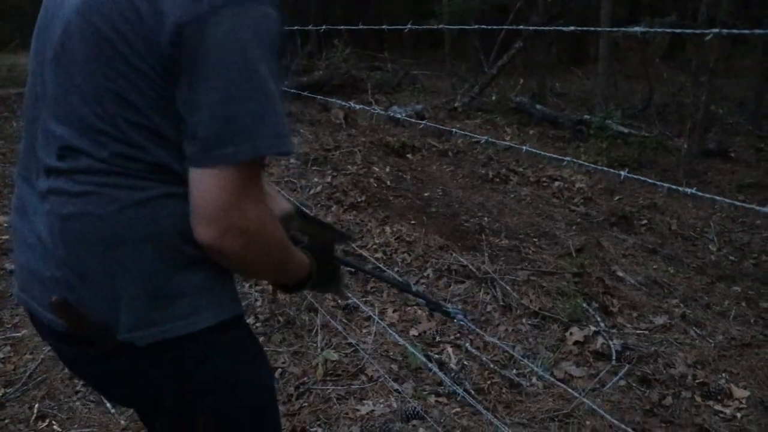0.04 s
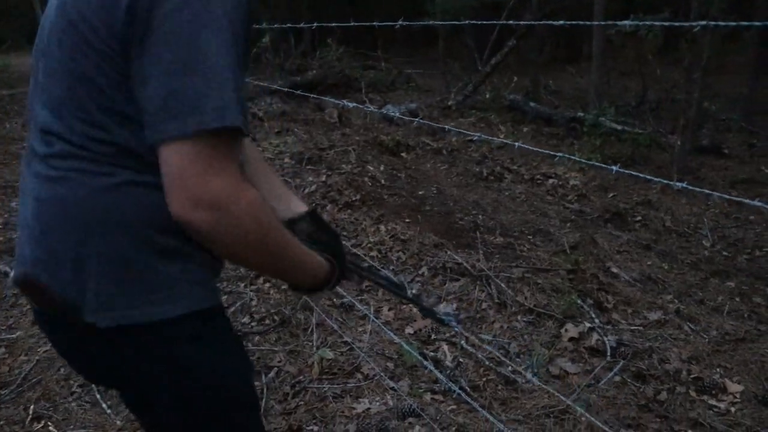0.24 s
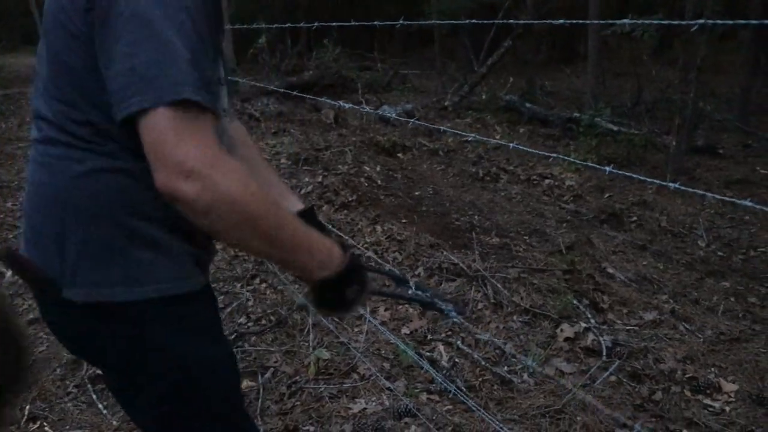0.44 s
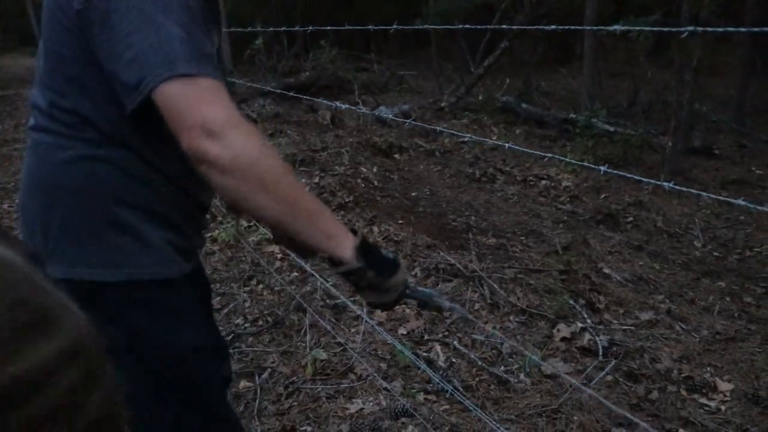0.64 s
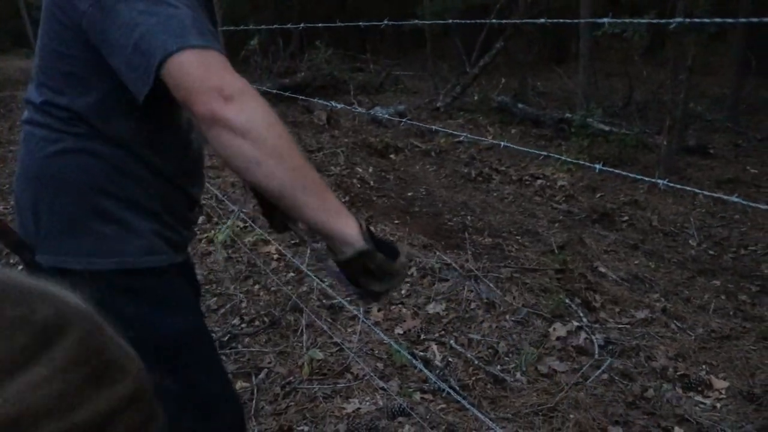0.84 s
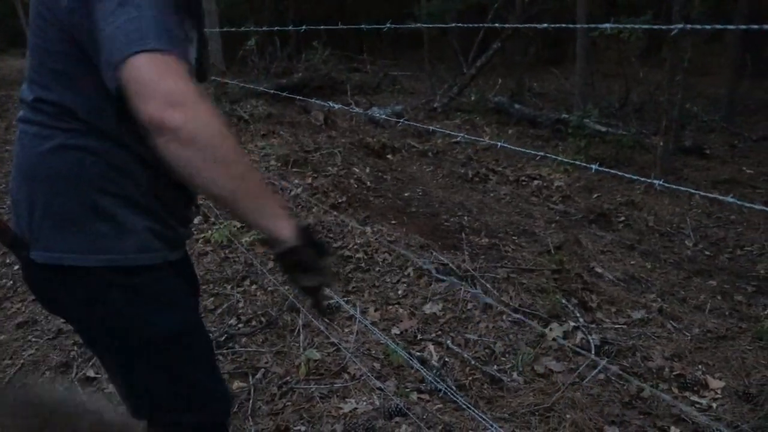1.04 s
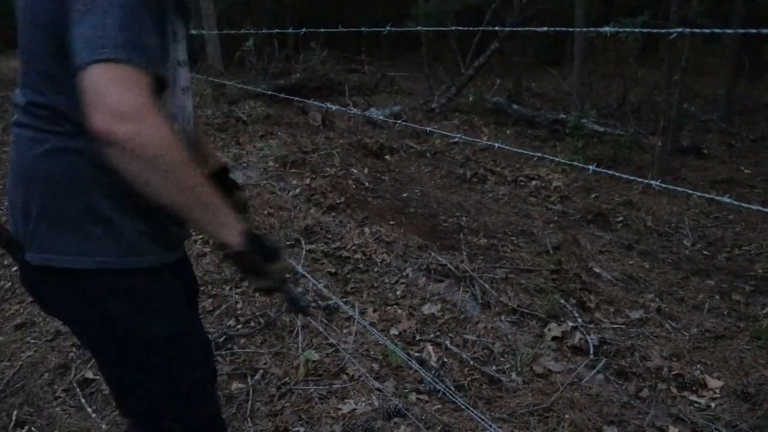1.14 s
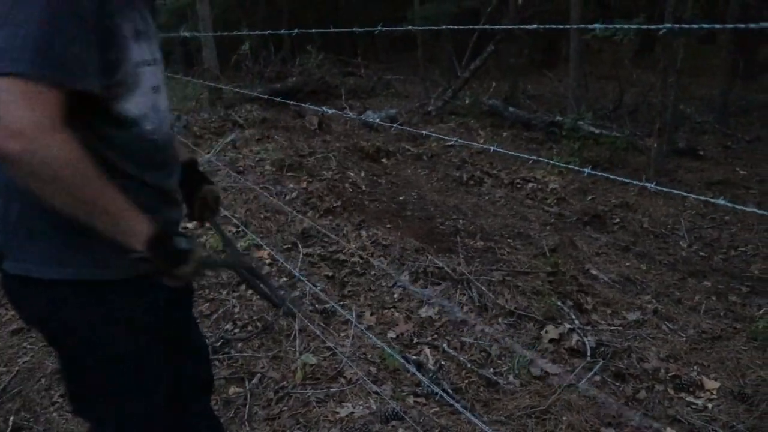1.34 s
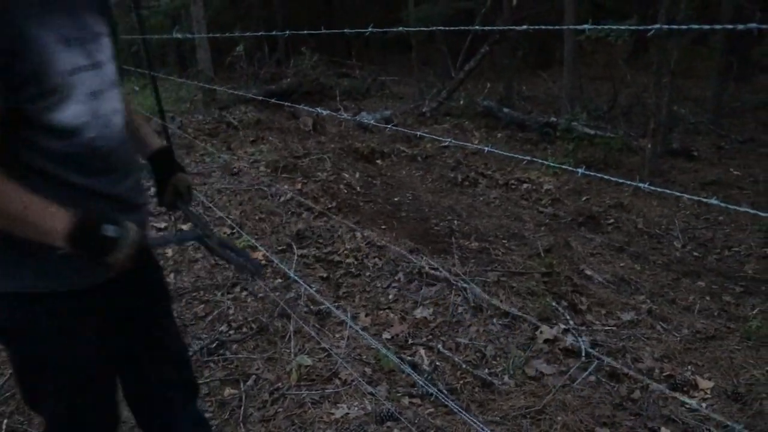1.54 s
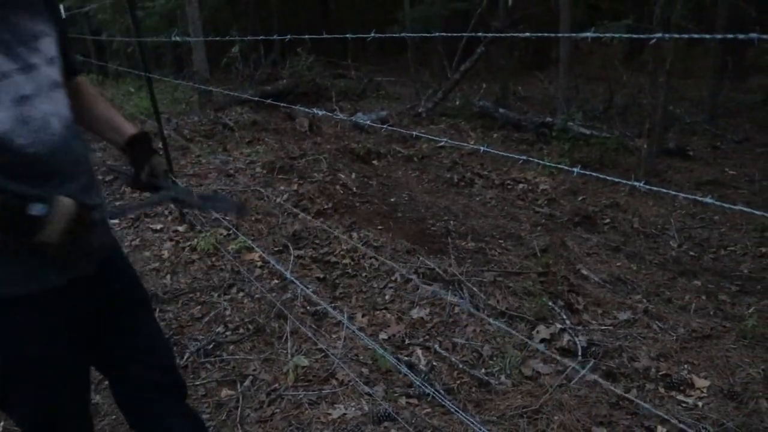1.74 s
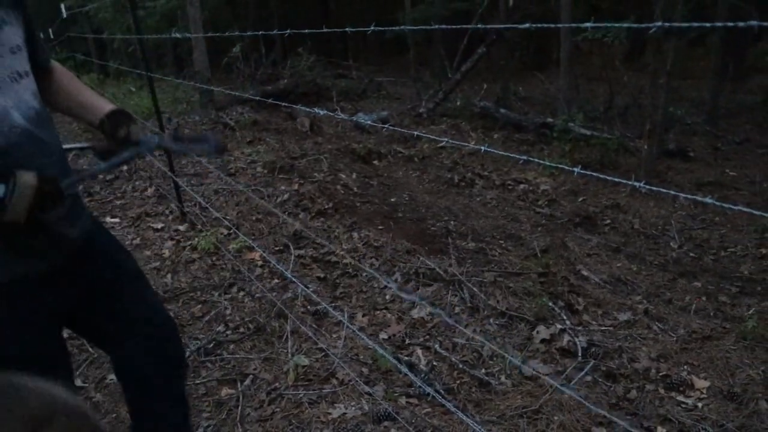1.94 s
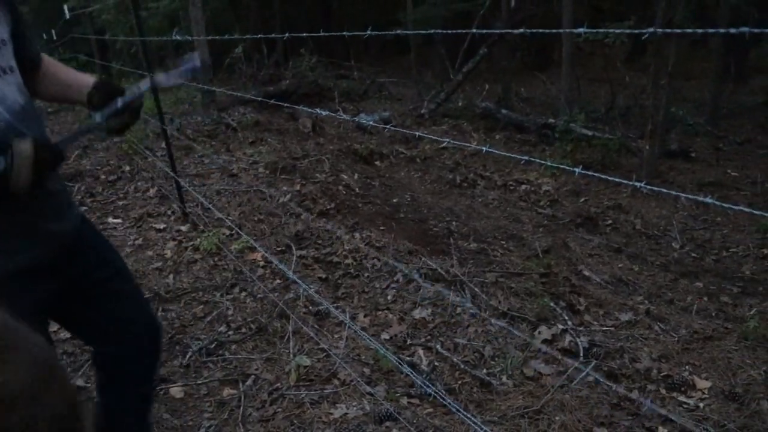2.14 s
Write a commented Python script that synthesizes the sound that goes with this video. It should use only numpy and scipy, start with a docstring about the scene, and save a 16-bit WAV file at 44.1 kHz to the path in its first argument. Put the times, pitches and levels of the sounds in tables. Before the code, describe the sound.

A steel fence tool jingling thinly, with a clack, a squeak and steps on dry leaves.

```python
"""Lifting a tensioning tool off a fence

Someone lifts a steel tensioning tool off barbed wire and steps back over dry leaves. Small loose
parts jingle in very high, beating modes, the jaws clack, the wire rasps and a joint squeaks once.
Leaves and clothes rustle in tiny cracks, twigs tick and boots bump over the quiet air of a wood."""
import sys
import numpy as np
from scipy import signal
from scipy.fft import rfft, irfft
from scipy.io import wavfile
from scipy.ndimage import uniform_filter1d

SR = 44100
rng = np.random.default_rng(int(sys.argv[2]) if len(sys.argv) > 2 else 0)


def waveform_to_disk(signal):
    """Save audio, clipped to [-1, 1], as 16-bit WAV at the path in sys.argv[1]."""
    frames = np.transpose(np.atleast_2d(signal))
    scaled = np.clip(frames, -1, 1) * 32767
    samples = np.round(scaled).astype(np.int16)
    wavfile.write(sys.argv[1], SR, samples)


N = 97020

# Tone curves of the air, the leaves, a knock's crack and steel scraping on steel.
# Each row: frequency in Hz, relative level in dB.
AIR_EQ = [(20, 0), (80, -9.5), (300, -7), (1000, -13), (3500, -11.5), (6000, -18), (8800, -6), (11000, -14),
          (15500, -15.5)]
LEAF_EQ = [(170, -13.5), (330, -4.5), (1000, -3.5), (1750, -1), (2800, -3), (6500, -5), (9000, -1.5),
           (11000, -15), (15500, -20)]
CRACK_EQ = [(100, -40), (380, -5), (900, -9), (1500, 1.5), (2300, 3), (2900, -8), (8500, -6),
            (13500, -20.5), (16000, -28)]
SCRAPE_EQ = [(3200, -23), (4800, -18), (6500, -24), (9000, -20), (11000, -24), (12500, 0), (14000, -1.5),
             (15500, -16)]
# The fader ride of the body's movement. Each row: time in seconds, level in dB.
MOVEMENT_RIDE = [(0, -50), (.1, -43.5), (.19, -49.5), (.29, -44.5), (.36, -38), (.42, -39.5), (0.521, -40),
                 (.6, -48), (0.769, -44.5), (.85, -38.5), (.96, -37), (1.12, -43.5), (1.25, -49),
                 (1.455, -57.5), (1.468, -41.5), (1.53, -43.5), (1.62, -45.5), (1.741, -46.5), (1.82, -48),
                 (1.9, -45), (1.99, -42), (2.06, -54)]
# Boots landing. Each row: start in seconds, level in dB, crunch t60 in seconds, centre in Hz.
BOOT_STEPS = [(.508, -33, 0.08, 1600), (.518, -31.5, 0.03, 950), (.529, -27, 0.021, 540),
              (0.58, -34.5, 0.021, 620), (1.104, -29, .03, 367), (1.585, -33.5, 0.016, 850),
              (1.604, -41, .06, 320)]
# Twigs and barbs. Each row: start in seconds, relative level in dB, centre in Hz.
TWIG_TICKS = [(.2432, -14, 9500), (.6105, -21, 6000), (.6175, -24, 3200), (.654, -24, 3400),
              (.894, -23, 2000), (1.04, -25, 1500), (1.306, -20, 4000), (1.331, -28, 2400),
              (1.627, -27, 1800), (1.565, -25, 5500), (1.668, -23, 8000)]
# Wire dragging through the jaws. Each row: start in seconds, length in seconds, level in dB.
WIRE_DRAGS = [(0.056, 0.05, -32), (0.63, 0.11, -42.5)]
# What the dragging rings. Each row: frequency in Hz, relative level in dB.
RASP_MODES = [(1670, 0.5), (1900, -9), (2450, 1.5), (3450, 1.5), (4900, -5)]
# The joint's squeak. Each row: time in seconds, pitch in Hz, level in dB.
SQUEAK_CURVE = [(1.872, 6800, -60), (1.882, 7060, -41), (1.9, 6930, -32), (1.906, 6800, -27.5),
                (1.912, 7064, -20.5), (1.924, 7100, -18.5), (1.942, 7080, -24), (1.958, 7040, -25),
                (1.966, 7200, -39)]
# Light touches around the tool. Each row: start in seconds, level in dB, t60 in seconds,
# contact noise in relative dB, then the main, low and third mode in Hz.
TOOL_CLINKS = [(1.383, -37, .04, -6, 3445, 1340, 4720), (2.184, -29, .035, 5, 5590, 1800, 3450)]
# Jaws and handles knocking. Each row: start in seconds, relative level in dB, t60 in seconds,
# treble tilt in dB per decade.
JAW_KNOCKS = [(.003, -26.5, 0.032, 5), (0.068, -32, 0.028, -3), (.839, -29, 0.031, -17),
              (1.4996, -13, 0.022, -6), (1.5012, -9.5, 0.02, -3.5), (1.5085, -21, 0.018, 11)]
# The tool's body. Each row: frequency in Hz, relative level in dB, factor on the knock's t60.
BODY_MODES = [(1320, -9, 1.05), (1483, -5.5, 0.92), (1720, -5, 0.72), (2298, -.5, 1.28), (2430, -8, 1.2),
              (3395, -6.5, 1.5), (3577, -6.5, 1.7), (3820, -12, 1.5), (4645, -11, 1.8), (5630, -7.5, 1.2),
              (7040, -14, 1.1), (7860, -9, 1.7), (8140, -13, 1.4)]
# The hard clack's long tail. Each row: frequency in Hz, level in dB, t60 in seconds.
CLACK_TAIL = [(10200, -34, 0.2), (12600, -38, .15), (13700, -30, .06)]
# Loose parts skidding. Each row: start in seconds, level in dB, t60 in seconds.
PART_SKIDS = [(.341, -22, .03), (.356, -19, .06), (.833, -25, .04), (1.7265, -26, .03), (1.731, -11, .016),
              (1.734, -17, .035), (1.739, -24, .035)]
# Loose parts touching. Each row: start in seconds, relative level in dB, t60 in seconds,
# upper-mode boost in dB.
PART_HITS = [(.012, -33, 0.3, -6), (.092, -25, .17, -3), (.1625, -29, 0.098, -12), (.2245, -12, 0.34, -4),
             (.2435, -12, 0.2, 2), (.266, -12, 0.25, -2.5), (.294, -15.5, 0.28, 6), (.313, -15, 0.22, -6),
             (0.3393, -6.5, 0.065, -18), (.356, -9.5, 0.073, -4), (.374, -7.5, 0.047, -17),
             (.4372, -21.5, 0.12, 2), (.553, -27, .05, -5), (0.5796, -26, 0.13, -3), (.604, -29, 0.2, -8),
             (.682, -26.5, .045, -3), (.8235, -17, 0.088, -17), (.833, -19, 0.073, -2),
             (0.9007, -18.5, 0.082, -9), (.945, -18, .23, 0.5), (0.984, -25, 0.34, -3),
             (1.016, -27, 0.23, -11), (1.0825, -15.5, 0.085, -3), (1.132, -21, 0.056, -5),
             (1.18, -25, .075, 3), (1.633, -35.5, 0.13, 2.5), (1.659, -28, .08, -12),
             (1.668, -23, 0.064, -11), (1.701, -22, 0.058, -12), (1.711, -29, 0.066, 3),
             (1.7312, -18, .06, -4), (2.174, -33.5, 0.22, -11)]
# Their ring. Each row: frequency in Hz, relative level in dB, share of the boost from 0 to 1.
PART_MODES = [(12225, -10, 0), (12362, -6, 0), (12412, -3, 0), (12812, -12, 1), (12855, -3, 1),
              (13765, -17, 1), (13795, -10, 1)]
# Their tuning shifts as they move. Each row: time in seconds, pitch ratio.
PART_TUNING = [(.35, 1), (.44, 1.003), (.83, 1.001), (.9, .995), (1.08, .994), (1.15, 1.004), (2.2, 1.002)]


def undb(db):
    """Decibels to gain."""
    return 10 ** (np.asarray(db) / 20)


def unit(x):
    """Scale to rms 1."""
    return x / np.sqrt(np.mean(x ** 2) + 1e-18)


def fade(t60):
    """Exponential decay, 60 dB down after t60 seconds."""
    return np.exp(-np.log(1000) * np.arange(N) / SR / max(t60, 1 / SR))


def add(out, start, x):
    """Mix x in from start seconds on."""
    i = int(np.clip(start * SR, 0, N - 1))
    out[i:i + len(x)] += x[:N - i]


def colour(x, points):
    """EQ x through (Hz, dB) points, rolling off outside them; rms 1."""
    hz, db = np.array(points, float).T
    f = np.arange(N // 2 + 1) * SR / N + 1
    curve = undb(np.interp(np.log(f), np.log(hz), db))
    skirt = np.minimum(f / hz[0], 1) ** 2 * np.minimum(hz[-1] / f, 1) ** 2
    return unit(irfft(rfft(x) * curve * skirt, N))


def noise(points):
    """Coloured noise of rms 1."""
    return colour(rng.standard_normal(N), points)


def band(hz):
    """Noise in a broad hump around hz."""
    return noise([(hz / 2, -10), (hz, 0), (hz * 2, -12)])


def drift(rate):
    """Smooth random wander of rms 1, turning rate times a second."""
    hold = max(int(SR / rate), 1)
    stairs = np.repeat(rng.standard_normal(N // hold + 1), hold)
    return unit(uniform_filter1d(stairs, hold)[:N])


def ring(hz, t60, phase=0):
    """One decaying mode, starting at rms 1."""
    t = np.arange(SR // 2) / SR
    return np.sqrt(2) * np.sin(2 * np.pi * hz * t + phase) * fade(t60)[:len(t)]


def crackle(per_s, spread_db=2.5):
    """Tiny clicks at random moments, a few much louder than the rest."""
    sizes = undb(spread_db * np.minimum(rng.exponential(size=N), 4)) * rng.standard_normal(N)
    return sizes * (rng.random(N) < per_s / SR)


def resonate(drive, response):
    """Play drive through a resonator; rms 1."""
    return unit(signal.fftconvolve(drive, response)[:N])


def match_energy(x, envelope):
    """Scale x to the energy that the envelope holds."""
    return x * np.sqrt(np.sum(envelope ** 2) / (np.sum(x ** 2) + 1e-18))


def low_cut(x, hz):
    """Roll off the bass below hz."""
    return signal.sosfilt(signal.butter(3, hz, "high", fs=SR, output="sos"), x)


def movement():
    """How briskly the body moves, as a gain."""
    return undb(np.interp(np.arange(N) / SR, *np.array(MOVEMENT_RIDE).T))


def air():
    """The bed: steady hiss of the wood and a faint swelling rumble."""
    hiss = undb(-49.5) * noise(AIR_EQ)
    rumble = undb(-64 + 1.5 * drift(5.84)) * band(hz=28)
    return hiss + rumble


def wood_echo(near):
    """The trees scatter back a short, soft reverb."""
    trees = noise([(150, 7), (2000, -5), (8000, -7.5), (15000, -6)]) * fade(t60=.34)
    return undb(-18) * signal.fftconvolve(near, trees / np.sqrt(np.sum(trees ** 2)))[:N]


def rustle(flicker_db=1.5, clump_db=1.6):
    """Dry leaves and cloth: clumps of tiny cracks, each in its own octave, riding the movement."""
    f = np.arange(N // 2 + 1) * SR / N + 1
    spectrum = 0
    for hz in 125 * 2 ** np.arange(8):
        octave = np.cos(np.pi / 2 * np.clip(np.log2(f / hz), -1, 1))
        spectrum += rfft(crackle(per_s=1600)) * octave
    flutter = undb(flicker_db * drift(40) + clump_db * drift(300))
    return colour(irfft(spectrum, N), LEAF_EQ) * movement() * flutter


def steps(thump_cycles=6):
    """Boots on leaf litter: a dull thump swells and dies in a few cycles, inside a short crunch."""
    out = np.zeros(N)
    for start, db, t60, hz in BOOT_STEPS:
        crunch = match_energy(band(hz) * fade(t60), fade(t60))
        thump = ring(hz, thump_cycles / hz) - ring(hz, thump_cycles / hz / 2)
        add(out, start, undb(db) * crunch)
        add(out, start, undb(db + 4) * thump)
    return low_cut(out, hz=190)  # the litter gives off little bass


def ticks():
    """Dry snaps of twigs and barbs: a broad crack, then a little splintering."""
    out = np.zeros(N)
    crack, splinter = fade(t60=.007), undb(-17) * fade(t60=.04)
    for start, db, hz in TWIG_TICKS:
        snap = noise([(hz / 2, -4), (hz, 0), (hz * 2, -6)])
        add(out, start, undb(db) / 2 * snap * (crack + splinter))
    return out


def wire():
    """The taut wire rings faintly as it is handled."""
    return undb(-17) * movement() * resonate(crackle(per_s=2800), ring(hz=1700, t60=.06))


def drags():
    """Stick-slip of wire on steel: a short rasp in a few broad resonances."""
    t = np.arange(N) / SR
    steel = sum(undb(db) * ring(hz, t60=.011, phase=np.pi / 2) for hz, db in RASP_MODES)
    envelope = np.zeros(N)
    for start, length, db in WIRE_DRAGS:
        progress = np.clip((t - start) / length, 0, 1)
        envelope += undb(db) * np.sqrt(np.abs(np.sin(np.pi * progress)))
    return resonate(crackle(per_s=2800), steel) * envelope


def squeak(lock_s=1.91):
    """Friction in the joint locks onto one mode of the steel, which rings on faintly."""
    t = np.arange(N) / SR
    times, hz, db = np.array(SQUEAK_CURVE).T
    wobble = np.where(t < lock_s, .017, .0048) * drift(700)  # the pitch steadies once it locks
    phase = 2 * np.pi * np.cumsum(np.interp(t, times, hz) * (1 + wobble)) / SR
    gate = (t > times[0]) * (t < times[-1])
    force = undb(np.interp(t, times, db) + 1.2 * drift(200)) * gate
    tone = force * (np.sin(phase) + undb(-20) * np.sin(2 * phase)) * np.sqrt(2)
    tail = resonate(tone, ring(hz=7130, t60=.25)) * np.std(tone)
    return tone + undb(-26) * tail


def clinks():
    """Light touches on steel: a main mode and two weaker ones, with contact noise on the attack."""
    out = np.zeros(N)
    for start, db, t60, contact_db, main_hz, low_hz, third_hz in TOOL_CLINKS:
        side_modes = undb(-9) * (ring(low_hz, t60) + ring(third_hz, t60))
        add(out, start, undb(db) * (ring(main_hz, t60) + side_modes))
        add(out, start, undb(db + contact_db) * band(hz=2600) * fade(t60 / 2))
    return out


def knocks(clack_s=1.501):
    """Steel meets steel: a crack and modes damped by the gloves; the hardest clack rings on."""
    out = np.zeros(N)
    pivot_hz = BODY_MODES[3][0]
    for start, db, t60, tilt_db in JAW_KNOCKS:
        phases = rng.uniform(0, 2 * np.pi, len(BODY_MODES))
        body = 0
        for (hz, mode_db, sustain), phase in zip(BODY_MODES, phases):
            gain = undb(mode_db + tilt_db * np.log10(hz / pivot_hz))
            body += gain * ring(hz, t60 * sustain, phase)
        add(out, start, undb(db) * body / 2)
        add(out, start, undb(db - 7) * noise(CRACK_EQ) * fade(t60=.029))
    for hz, db, t60 in CLACK_TAIL:
        add(out, clack_s, undb(db) * ring(hz, t60))
    return low_cut(out, hz=330)  # the tool gives off little bass


def skids():
    """Loose parts slide hard: a burst of tiny impacts, too damped to settle into clear pitches."""
    out = np.zeros(N)
    for start, db, t60 in PART_SKIDS:
        grit = colour(crackle(per_s=6000), SCRAPE_EQ)
        add(out, start, undb(db) * match_energy(grit * fade(t60), fade(t60)))
    return out


def part_ring(start, t60, boost_db, detune=.00096):
    """One touch sets the close, beating modes of the loose parts going."""
    pitch = np.interp(start, *np.array(PART_TUNING).T)
    tone = 0
    for hz, db, share in PART_MODES:
        mistune, phase = rng.standard_normal(2) * (detune, np.pi)
        tone += undb(db + share * boost_db) * ring(hz * pitch * (1 + mistune), t60, phase)
    return tone


def jingles(attack_s=.0013, chatter_s=.04, choke_lead_s=.00074, choke_t60=.039, trim_db=-.5):
    """Loose steel parts ring, chatter and scrape; each touch chokes the last ring as it lands."""
    out = np.zeros(N)
    t = np.arange(SR // 2) / SR
    attack = 1 - np.exp(-t / attack_s)
    scrape = noise(SCRAPE_EQ)
    damped_modes = sum(undb(db) * ring(hz, t60=.025) for hz, db, _ in PART_MODES)
    chatter = resonate(rng.standard_normal(N), damped_modes)
    gaps = np.diff([hit[0] for hit in PART_HITS] + [2 * N / SR])  # the last hit rings free
    for (start, db, t60, boost_db), gap in zip(PART_HITS, gaps):
        tone = part_ring(start, t60, boost_db)
        decay = fade(t60)[:len(t)]
        shift = rng.integers(N)
        buzz = undb(-14) * np.roll(chatter, shift)[:len(t)] * decay * np.exp(-t / chatter_s)
        scratch = undb(-21) * (np.roll(scrape, shift) * fade(t60=.015))[:len(t)]
        choke = np.exp(-np.log(1000) * np.maximum(t - gap + choke_lead_s, 0) / choke_t60)
        gate = attack * choke
        hit = match_energy(gate * (tone + buzz + scratch), gate * decay)
        add(out, start, undb(db + trim_db) * hit)
    shiver = undb(-7) * movement() * chatter  # the parts tremble with every movement
    return out + shiver


def scene():
    """Tool, fence and footwork up close, set in the echo and air of the wood; mono."""
    tool_and_fence = jingles() + skids() + knocks() + clinks() + wire() + drags() + squeak()
    near = tool_and_fence + ticks() + steps() + rustle()
    return (near + wood_echo(near) + air())[None]


def record(dry):
    """A steep low-pass takes off the very top, above 15.9 kHz."""
    return signal.sosfilt(signal.ellip(10, .2, 80, 15900, fs=SR, output="sos"), dry)


dry = scene()
out = record(dry)
waveform_to_disk(out)
```